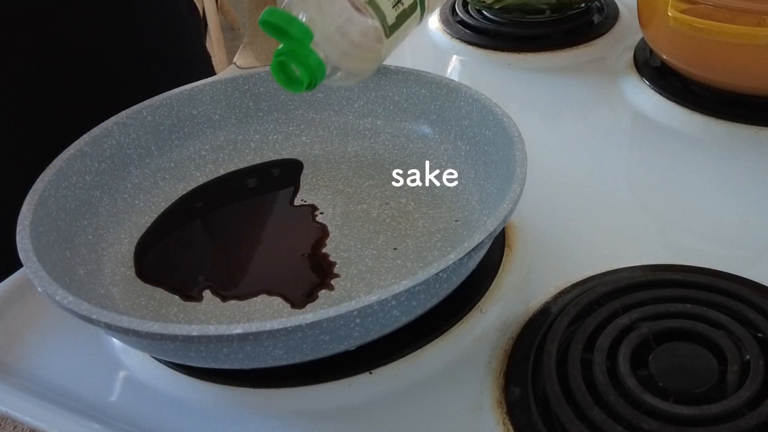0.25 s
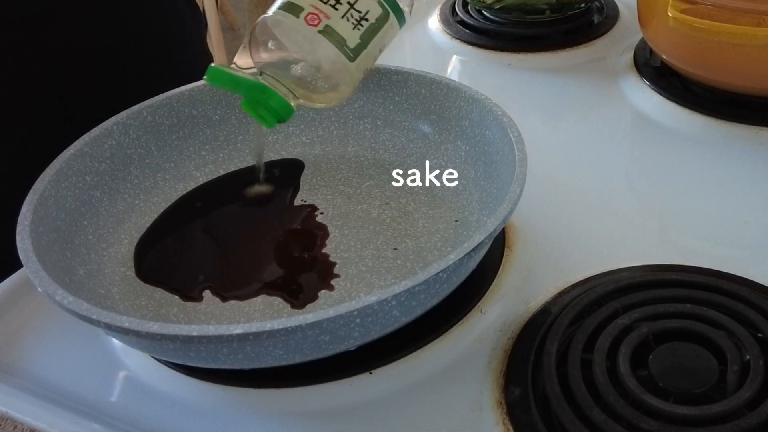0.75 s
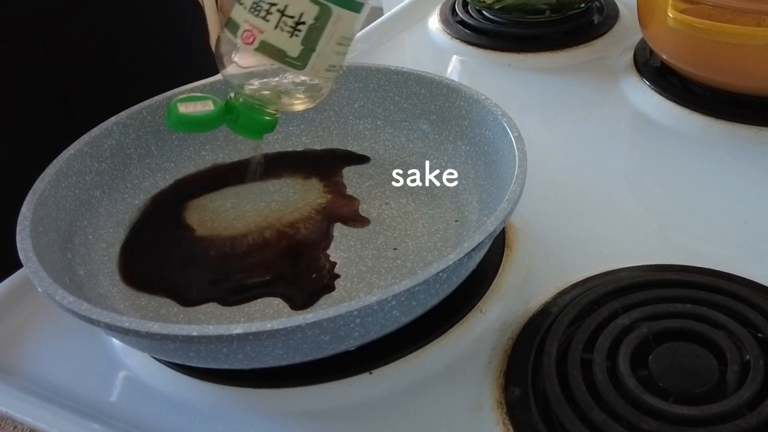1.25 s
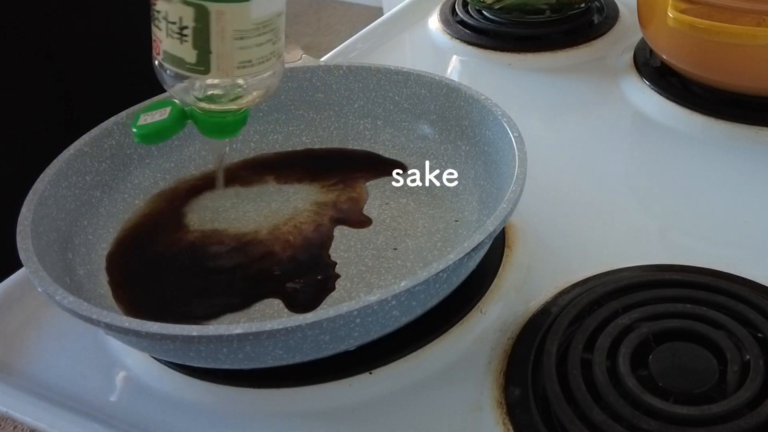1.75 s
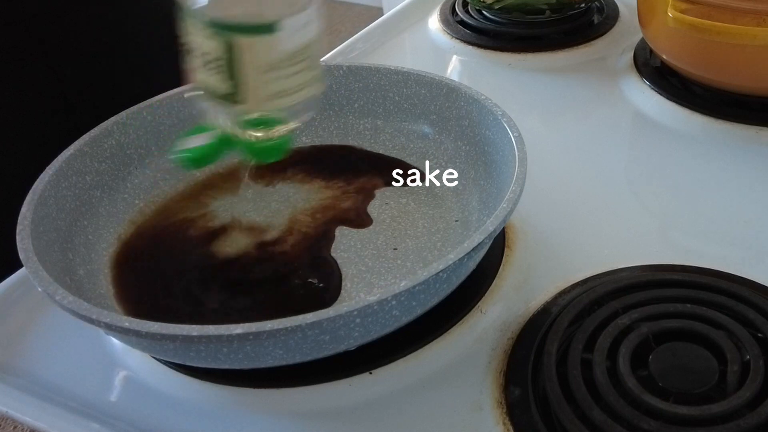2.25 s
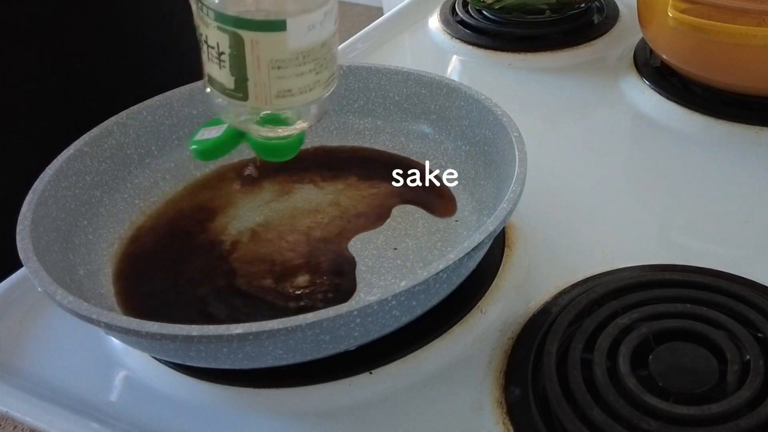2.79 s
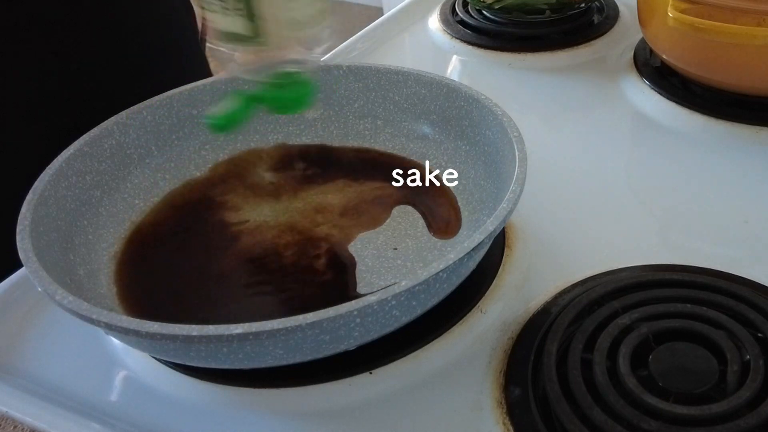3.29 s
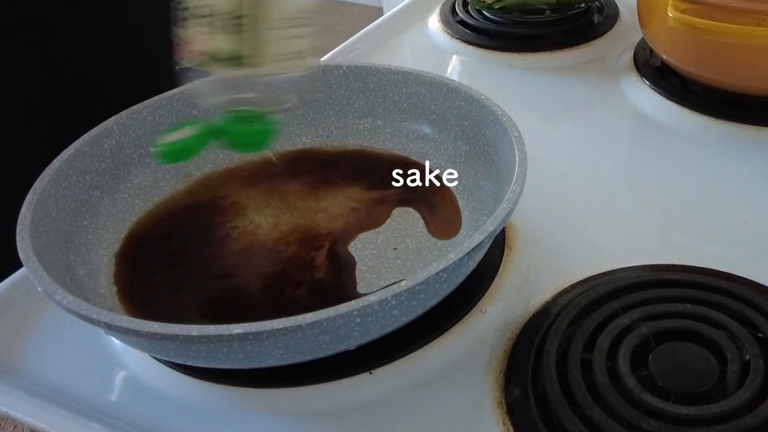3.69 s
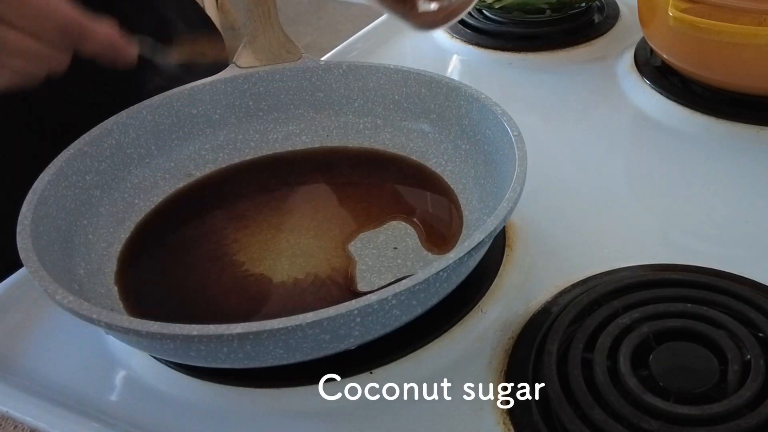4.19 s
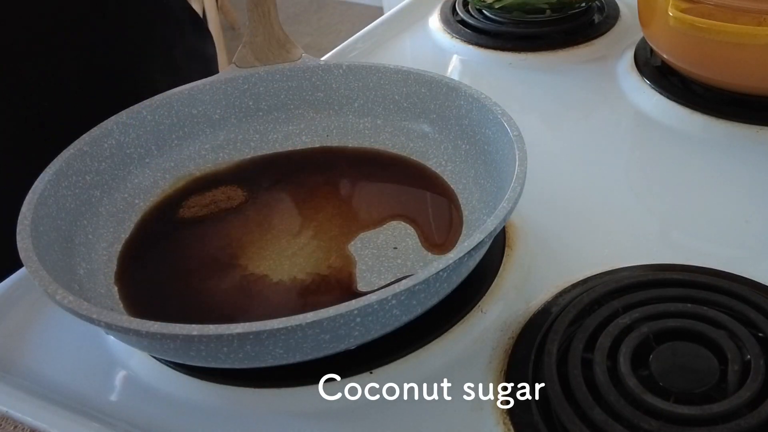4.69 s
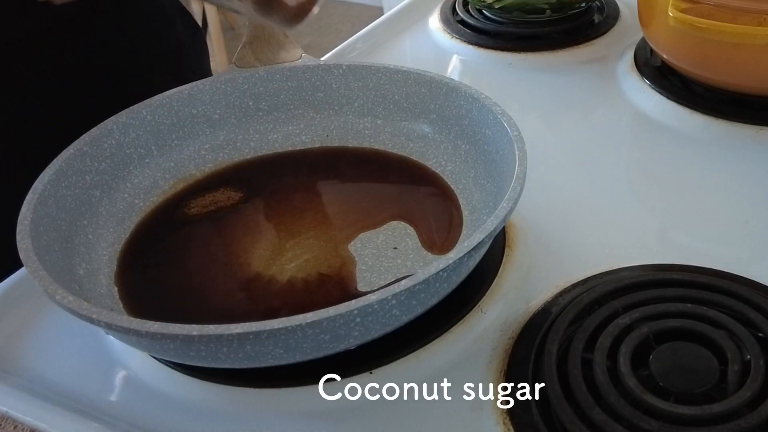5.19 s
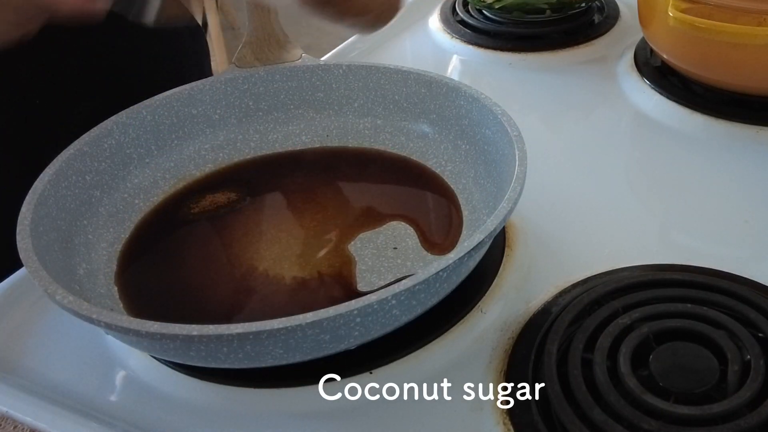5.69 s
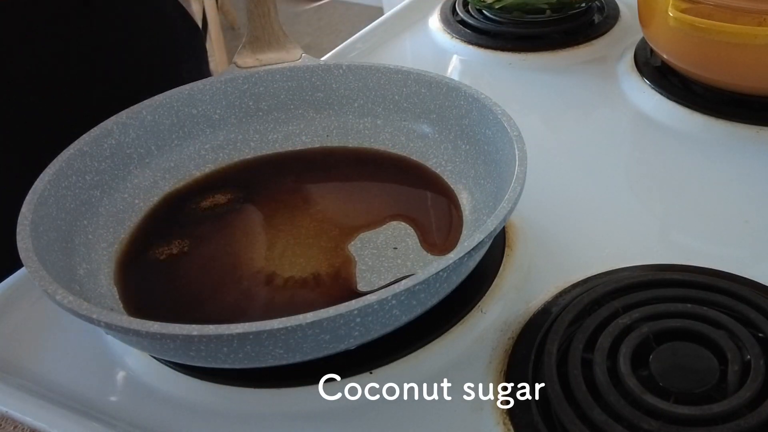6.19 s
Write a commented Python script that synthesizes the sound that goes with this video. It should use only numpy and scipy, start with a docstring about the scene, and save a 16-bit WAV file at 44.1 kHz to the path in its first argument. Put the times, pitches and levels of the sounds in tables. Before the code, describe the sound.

In a humming kitchen, a pan knock fades, liquid dribbles and drips into sauce, then sugar is spooned from a jar with clinks and ticks.

```python
"""First a knock on a pan dies away over a low motor hum, in a quiet kitchen. Rice wine trickles from a plastic
bottle into a pan of sauce: bursts of noise for splashes, gliding tones for drips, under a fine hiss and a thin
pulsing whine. A gulp of air follows. Then, among small clicks and ticks, a spoon clinks in a glass jar as a set
of ringing tones, grinds and scoops sugar as grainy noise, and tips it into the pan with a soft swish."""
import sys
import numpy as np
from scipy import signal
from scipy.fft import rfft, irfft, next_fast_len
from scipy.io import wavfile

SR = 44100
rng = np.random.default_rng(int(sys.argv[2]) if len(sys.argv) > 2 else 0)


def transcribe(signal):
    """Save signal, clipped to [-1, 1], as a 16-bit WAV file at the path in sys.argv[1]."""
    frames = np.atleast_2d(signal).T
    limited = np.clip(frames, -1, 1)
    pcm = np.round(limited * 32767).astype(np.int16)
    wavfile.write(sys.argv[1], SR, pcm)


N = 284445   # length in samples
TIME = np.arange(N) / SR   # seconds
BINS = np.maximum(np.arange(N // 2 + 1) * SR / N, 1)   # Hz
ROOM_T60_S = 0.46   # time for the room's reflections to fall by 60 dB
# share of a contact's power that is the same at both ears at its start, and how fast that share fades
DIRECT_SHARE, DIRECT_S = 0.3, 0.02

# In the tables, a colour says how strong a noise is at each pitch.
# Peaks are narrow resonances in that noise; a negative lift makes a dip instead.


def from_db(db):
    """Decibels to gain."""
    return 10 ** (np.asarray(db) / 20)


def rms_one(x):
    """Scale to unit power."""
    return x / np.sqrt(np.mean(x ** 2))


def over_hz(points):
    """A short spectrum spread over all frequencies."""
    hz, value = np.transpose(points)
    return np.interp(np.log(BINS), np.log(hz), value)


def drift(rate):
    """A random wander of about unit spread, with this many new random values a second."""
    knots = rng.standard_normal(int(N / SR * rate) + 3)
    return np.interp(TIME * rate, np.arange(len(knots)), knots)


def swell(s, length, db, rise_s, fall_s):
    """A gain that rises, holds from s for the given length, and falls."""
    before = np.maximum(s - TIME, 0)
    after = np.maximum(TIME - s - length, 0)
    return from_db(db) * np.exp(-before / rise_s - after / fall_s)


# How alike the noise is at the two ears. Each row: frequency in Hz, left-right correlation.
EAR_LIKENESS = [(50, 0.7), (130, 0.7944), (260, 0.78), (480, 0.14), (1100, 0.21), (2400, 0.55),
                (5000, -0.1415), (12000, 0.0335)]


def noise(colour, peaks=()):
    """Stereo noise of the given dB per Hz, lifted at resonances; the ears agree more at some pitches."""
    gain = from_db(over_hz(colour)) * np.sqrt(SR / 2)
    for hz, width, lift_db in peaks:
        resonance = 1 / (1 + (2 * (BINS - hz) / width) ** 2)
        gain = gain * np.sqrt(1 + (from_db(lift_db) ** 2 - 1) * resonance)
    alike = over_hz(EAR_LIKENESS)
    size = next_fast_len(N, True)
    mid, side = rfft(rng.standard_normal((2, size)))
    grid = np.arange(size // 2 + 1) * SR / size
    mid = mid * np.interp(grid, BINS, gain * np.sqrt((1 + alike) / 2))
    side = side * np.interp(grid, BINS, gain * np.sqrt((1 - alike) / 2))
    return irfft([mid + side, mid - side], size)[:, :N]


def bursts(rows, colour, attack, hold, t60, tail_db, peaks=()):
    """Short rough contacts: noise that rises, holds, dies, and lingers in the room, wider with age."""
    near, spread = np.zeros((2, N))
    for s, db in rows:
        start = int(s * SR)
        age = TIME[:min(N - start, SR // 2)]
        direct = from_db(-60 * np.maximum(age - hold, 0) / t60)
        tail = from_db(tail_db - 60 * age / ROOM_T60_S)
        rise = from_db(db) * (1 - np.exp(-age / attack))
        power = rise ** 2 * (direct ** 2 + tail ** 2)
        share = DIRECT_SHARE * np.exp(-age / DIRECT_S)
        near[start:start + len(age)] += power * share
        spread[start:start + len(age)] += power * (1 - share)
    same_at_both_ears = np.sqrt(near) * rms_one(noise(colour, peaks)[0])
    return same_at_both_ears + np.sqrt(spread) * rms_one(noise(colour, peaks))


def struck(rows, modes, scatter_db, flutter_db):
    """Each blow rings every mode at a strength of its own, fluttering as it dies; tilt thins the low modes."""
    out = np.zeros(N)
    top_hz = max(hz for hz, _, _ in modes)
    for s, db, tilt in rows:
        start = int(s * SR)
        age = TIME[:min(N - start, SR // 2)]
        for hz, mode_db, t60 in modes:
            chance_db = scatter_db * rng.standard_normal() + flutter_db * np.tanh(drift(70)[:len(age)])
            level_db = db + mode_db + tilt * np.log2(hz / top_hz) + chance_db
            ring = from_db(level_db - 60 * age / t60) * np.sin(2 * np.pi * hz * age)
            out[start:start + len(age)] += ring
    return out


def kitchen(x, wet_db):
    """Direct sound plus dense reflections, different at each ear."""
    age = TIME[:SR // 2]
    echoes = rng.standard_normal((2, len(age))) * from_db(-60 * age / ROOM_T60_S) * (age > .003)
    echoes /= np.sqrt(np.sum(echoes ** 2, axis=1, keepdims=True))
    return x + from_db(wet_db) * signal.fftconvolve(x[None], echoes, axes=1)[:, :N]


EASE_S = 2.875   # when the pouring eases
# Fainter spits fall at random between the spurts.
SPITS_PER_S, SPIT_DB, SPIT_SCATTER_DB = 5, -54, 2   # relative level, like the spurts
# The trickle lands in spurts. Each row: start in seconds, relative level in dB.
SPURTS = [(0.2664, -51), (0.4233, -46), (0.5705, -48), (0.6159, -50), (0.799, -47.5), (0.9456, -45),
          (1.0948, -48), (1.2235, -49.5), (1.3891, -49)]
# Each row: frequency in Hz, relative level in dB per Hz.
SPLASH_COLOUR = [(1000, 5.5), (2400, 2), (5500, 5), (8000, -6), (14000, -18)]


def splashes():
    """The trickle breaks the surface in spurts and random faint spits, each a short burst of noise."""
    times = np.cumsum(rng.exponential(size=40)) / SPITS_PER_S
    levels = SPIT_DB + SPIT_SCATTER_DB * rng.standard_normal(size=40)
    spits = [(s, db) for s, db in zip(times, levels) if s < EASE_S]
    landings = list(SPURTS) + spits
    return from_db(-7.5) * bursts(landings, SPLASH_COLOUR, attack=0.001635, hold=0.0063, t60=0.041,
                                  tail_db=-3)


WALL_S, WALL_DB = 0.0096, -11   # delay and level of the first echo, off the wall behind the stove
# Each row: start in seconds, level in dB, starting pitch in Hz, final pitch in Hz,
# glide time in seconds, time to fall by 60 dB in seconds.
DRIPS = [(1.959, -51.5, 3120, 3250, .01, 0.07), (2.269, -54.5, 1520, 1600, 0.00959, .08),
         (2.562, -52, 3333, 3380, 0.0072, 0.042), (2.641, -53, 1863, 2070, .004, .025),
         (2.642, -41, 2350, 2650, 0.0022, 0.024), (3.325, -49.5, 5850, 6400, .005, 0.016),
         (3.372, -58, 7343, 8600, .004, .02), (3.389, -52, 5220, 6200, 0.0032, 0.02),
         (3.403, -41.5, 3851, 11900, 0.0075, 0.017), (3.423, -51.5, 4400, 3440, 0.001872, 0.0304),
         (3.428, -51.5, 4000, 4503, 0.0043, 0.041), (3.534, -51.5, 1340, 1570, 0.010804, 0.084),
         (3.604, -55, 6747, 9000, .003, .015)]


def drips():
    """A trapped bubble rings briefly and glides, mostly up, near the surface; the wall echoes it once."""
    out, age = np.zeros(N), TIME[:SR // 10]
    for s, db, start_hz, end_hz, glide, t60 in DRIPS:
        start = int(s * SR)
        pitch = end_hz + (start_hz - end_hz) * np.exp(-age / glide)
        pitch = pitch * (1 + 0.043 * drift(899)[:len(age)])   # a rough, unsteady pitch
        level = from_db(db - 60 * age / t60) * (1 - np.exp(-age / 0.00039))
        out[start:start + len(age)] += level * np.sin(2 * np.pi * np.cumsum(pitch) / SR)
    out = out + from_db(WALL_DB) * np.interp(TIME - WALL_S, TIME, out)
    return kitchen(out, wet_db=-6)


SPRAY_ABOVE_HZ = 3600   # drips that start higher than this throw up spray
# Each row: frequency in Hz, relative level in dB per Hz.
DRIP_SPRAY_COLOUR = [(900, -20.5), (2500, -10), (4300, -1), (6500, 7), (9000, -1), (15000, -11.5)]


def drip_spray():
    """Each of the small, high drips throws up a little spray of noise as it lands."""
    small = [(s, db) for s, db, hz, *_ in DRIPS if hz > SPRAY_ABOVE_HZ]
    return from_db(-12.0) * bursts(small, DRIP_SPRAY_COLOUR, attack=.0005, hold=0.003863, t60=0.072,
                                   tail_db=-20.5)


# A knock on the pan. Each row: start in seconds, relative level in dB, tilt in dB per octave.
PAN_KNOCKS = [(.001, -48.5, 0)]
# Each row: frequency in Hz, level in dB against the knock, time to fall by 60 dB in seconds.
PAN_MODES = [(592.6, 3.5, 0.5), (832, -4, 0.28), (1373, 0.5, 0.37), (1623.7, -4, 0.32)]
# Each row: frequency in Hz, relative level in dB per Hz.
PAN_COLOUR = [(170, 4), (450, -5), (680, -13), (1000, -19), (1500, -22), (4000, -24), (9000, -31),
              (16000, -51.5)]


def pan_knock():
    """The knocked pan rings at a few pitches over a dull thud of noise."""
    ring = kitchen(struck(PAN_KNOCKS, PAN_MODES, scatter_db=.5, flutter_db=1), wet_db=-18)
    knocks = [(s, db) for s, db, _ in PAN_KNOCKS]
    thud = bursts(knocks, PAN_COLOUR, attack=0.000467, hold=0.022, t60=0.19, tail_db=1)
    return ring + from_db(8.5) * thud


# The plastic bottle snaps. Each row: start in seconds, relative level in dB.
SNAPS = [(2.0754, -42.5)]
# Each row: frequency in Hz, relative level in dB per Hz.
SNAP_COLOUR = [(850, -7), (1200, 4.5), (1500, 7), (2200, 2.5), (3200, -3), (5000, -5), (6400, 0),
               (10000, -11), (16000, -20.5)]
# Each row: frequency in Hz, width in Hz, lift in dB.
SNAP_PEAKS = [(1230, 160, 5.5), (1965, 179.5, 1)]


def bottle_snap():
    """The bottle wall snaps: one very short burst of noise with two resonances."""
    return from_db(0.5) * bursts(SNAPS, SNAP_COLOUR, attack=0.0002, hold=0.0015, t60=0.065,
                                 tail_db=-18, peaks=SNAP_PEAKS)


def pouring():
    """The pan rings out, the trickle splashes and drips, the bottle wall snaps."""
    return pan_knock() + splashes() + bottle_snap() + drips() + drip_spray()


HISS_DB, HISS_EASED_DB = -58.5, -65.5
STOP_S, HISS_RELEASE_S = 3.73, .028   # when the hiss ends, and how quickly each step falls
RUSTLE_S, RUSTLE_HOLD_S, RUSTLE_DB = 3.867, 0.19, -64   # the bottle is taken away
# For the hiss. Each row: frequency in Hz, relative level in dB per Hz.
HISS_COLOUR = [(1400, -6), (2100, -13.5), (3100, 3), (4000, -7), (6000, -3.5), (8500, -5), (12000, -6),
               (16000, -2.5)]
# Each row: frequency in Hz, width in Hz, lift in dB.
HISS_PEAKS = [(2337, 110, 12), (2944, 19, 9.5), (3220, 74, -5), (3900, 122.3, 4.5), (4470, 310, 10),
              (5100, 100, 5), (5700, 42, 9.5), (6032, 110, 5), (7808.9, 200, 7), (9320, 93, 7),
              (10480, 90, -10), (10900, 160, 5.5), (11900, 120, 5), (13900, 110, 4)]
# For the rustle. Each row: frequency in Hz, relative level in dB per Hz.
RUSTLE_COLOUR = [(900, -7), (1800, -1), (3000, -4), (6000, -7), (10000, -11.5), (16000, -17.5)]


def hiss():
    """A fine noise with fixed resonances drops to a lower step and stops; a soft rustle takes over."""
    full = swell(0, EASE_S, HISS_DB, HISS_RELEASE_S, HISS_RELEASE_S)
    eased = swell(0, STOP_S, HISS_EASED_DB, HISS_RELEASE_S, HISS_RELEASE_S)
    level = np.maximum(full, eased) * from_db(1.3 * drift(45))
    rustle = swell(RUSTLE_S, RUSTLE_HOLD_S, RUSTLE_DB, rise_s=0.28, fall_s=0.1)
    return level * rms_one(noise(HISS_COLOUR, HISS_PEAKS)) + rustle * rms_one(noise(RUSTLE_COLOUR))


PULSE_S, PULSE_SCATTER_DB = 0.0099, 1.5883   # half-length and unevenness of the pulses
WHINE_HZ, WHINE_TONE_DB = 2296, -5.5   # the clear tone, and its level against the noise
# Runs of pulses. Each row: first pulse in seconds, end in seconds, spacing in seconds, level in dB.
# A row that ends before it starts plays nothing.
WHINE_RUNS = [(0.269, 0.31, 0.0403, -60), (0.41, 0.49, 0.057, -61.5), (0.569, 0.83, 0.05388, -65),
              (0.909, 0.96, 0.044, -64), (1.103, 1.3, 0.04286, -63.5), (1.426, 1.55, 0.03, -62.5),
              (1.602, 1.67, 0.057, -59), (1.708, 1.84, 0.0605, -64), (1.882, 2.14, 0.059, -62),
              (2.238, 2.62, 0.058, -67), (2.666, 2.84, 0.044, -68.5), (2.951, 2.95, 0.046, -61),
              (2.995, 3.19, 0.061, -65.5), (3.315, 3.57, 0.058, -64), (3.595, 3.73, 0.04422, -65.5)]
# Each row: frequency in Hz, relative level in dB per Hz.
WHINE_COLOUR = [(1000, -31), (2300, -5), (6000, 7), (9000, -22), (16000, -7)]
# Each row: frequency in Hz, width in Hz, lift in dB.
WHINE_PEAKS = [(2900, 170, 10.5), (4600, 58, 12), (4919.5, 91, 6), (6320, 76, 14), (7636, 82, 16)]


def whine():
    """Runs of soft pulses, each of its own strength, sound one clear tone and a resonant noise."""
    level = np.zeros(N)
    for first, end, spacing, db in WHINE_RUNS:
        for s in np.arange(first, end, spacing):
            around = slice(int((s - 3 * PULSE_S) * SR), int((s + 3 * PULSE_S) * SR))
            strength = from_db(db + PULSE_SCATTER_DB * rng.standard_normal())
            level[around] += strength * np.exp(-((TIME[around] - s) / PULSE_S) ** 2)
    tone = np.sqrt(2) * np.sin(2 * np.pi * WHINE_HZ * TIME + 2.6 * drift(50))
    return level * (from_db(WHINE_TONE_DB) * tone + rms_one(noise(WHINE_COLOUR, WHINE_PEAKS)))


# Spoon against the jar. Each row: start in seconds, relative level in dB, tilt of the ring in dB per
# octave, dull crack in dB against that level, bright crack in dB against that level.
CLINKS = [(5.1336, -37.5, 0, 3.5, -20), (5.2936, -41, 2, -8, 0.5)]
# Each row: frequency in Hz, relative level in dB, time to fall by 60 dB in seconds.
JAR_MODES = [(1680, -5, 0.14), (1710, 7, 0.0351), (1980, -13, .17), (2241.2, -11, 0.18), (3060, -11, 0.17),
             (3160, -17, 0.18), (3210, 7, 0.055), (5157, -3, 0.19), (5330, -10, 0.27), (5356, -8, 0.19),
             (6600, -19, 0.17), (7010, -12, 0.06), (8520, -23, .08), (9589, -17, .08)]
# For the chatter. Each row: frequency in Hz, relative level in dB per Hz.
CHATTER_COLOUR = [(200, -19), (600, 4), (1600, -2), (4000, -7), (5400, -4), (5950, -12), (6500, -4.5),
                  (9000, -7), (11000, -20), (16000, -24)]
# Clusters of close modes, as resonances. Each row: frequency in Hz, width in Hz, lift in dB.
CHATTER_PEAKS = [(1695.7, 143.2, 14), (3160, 90, 24), (5370, 230, 18), (6418, 160, 5), (7150, 180, 2),
                 (8500, 250, 9), (9500, 250, 4)]
# For the two cracks. Each row: frequency in Hz, relative level in dB per Hz.
DULL_CRACK_COLOUR = [(150, -31), (500, -5), (850, 11), (1050, 1), (1400, -9), (1750, 9), (2600, 2),
                     (3200, 11.5), (4100, -6), (4800, 6), (5250, 17.5), (5900, -21), (7200, -6),
                     (8700, -11.5), (9600, -13), (10500, -27.5), (13500, -24), (15000, -45)]
BRIGHT_CRACK_COLOUR = [(300, -30), (1000, -24), (2500, 7), (3800, -1), (5300, 15), (5900, -6), (6450, 8.5),
                       (7050, 20), (7800, -4.5), (8500, 10), (10200, -7), (11200, 0), (15500, -1)]


def clinks():
    """The spoon makes the glass ring, chatters on in clusters of modes, and cracks sharply at contact."""
    ring = struck([row[:3] for row in CLINKS], JAR_MODES, scatter_db=1, flutter_db=7)
    ring = kitchen(from_db(-11) * ring, wet_db=-4)
    chatter = bursts([row[:2] for row in CLINKS], CHATTER_COLOUR, attack=0.000764, hold=0.01, t60=0.085,
                     tail_db=-10.5, peaks=CHATTER_PEAKS)
    dull_rows = [(s, db + dull_db) for s, db, _, dull_db, _ in CLINKS]
    bright_rows = [(s, db + bright_db) for s, db, _, _, bright_db in CLINKS]
    dull = bursts(dull_rows, DULL_CRACK_COLOUR, attack=.0002, hold=.002, t60=.025, tail_db=-28)
    bright = bursts(bright_rows, BRIGHT_CRACK_COLOUR, attack=.0002, hold=.0025, t60=.035, tail_db=-21)
    return ring + from_db(-5.0) * chatter + dull + bright


# Sugar grinds under the spoon. Each row: start in seconds, length in seconds, level in dB.
GRINDS = [(5.217, 0.089, -67.5), (5.307, 0.0271, -61.5), (5.465, 0.053, -74)]
# Each row: frequency in Hz, relative level in dB per Hz.
GRIND_COLOUR = [(1500, -21.5), (4000, 7), (8000, 5), (11000, -1), (16000, -4)]


def grinding():
    """Sugar grains crushed under the spoon: bright noise with a fast random flicker."""
    level = sum(swell(s, length, db, rise_s=0.0093, fall_s=0.023) for s, length, db in GRINDS)
    return level * from_db(1.8 * drift(500)) * rms_one(noise(GRIND_COLOUR))


SCOOP_S, SCOOP_HOLD_S, SCOOP_DB = 5.662, .018, -50.5
SCOOP_RISE_S, SCOOP_FALL_S = .02, .034
# Each row: frequency in Hz, relative level in dB per Hz.
SCOOP_COLOUR = [(800, -2), (1700, -3.5), (3000, -7), (6000, -12), (10000, -21), (16000, -23)]
# Each row: frequency in Hz, width in Hz, lift in dB.
SCOOP_PEAKS = [(1780, 120, 15.5), (3040, 46, 25), (4850, 110, 16.5), (7450, 240, 14), (10550, 240, 17.5),
               (14013, 700, 12)]


def scoop():
    """The spoon digs into the sugar: grainy noise whose resonances make spoon and jar sing."""
    level = swell(SCOOP_S, SCOOP_HOLD_S, SCOOP_DB, SCOOP_RISE_S, SCOOP_FALL_S)
    return level * from_db(2.0 * drift(250)) * rms_one(noise(SCOOP_COLOUR, SCOOP_PEAKS))


# Air into the bottle, and later sugar off the spoon.
# Each row: start in seconds, length in seconds, level in dB, edge in seconds.
SWISHES = [(3.203, 0.096, -57, 0.011), (4.43, 0.0099, -71, 0.00755), (4.526, 0.023, -61, 0.019),
           (6.092, 0.017, -63.5, 0.01033)]
# Each row: frequency in Hz, relative level in dB per Hz.
SWISH_COLOUR = [(2000, -6.5), (4500, -4), (8500, -2), (12000, -5), (16000, -6)]


def swishes():
    """Brief grainy rushes of noise with soft edges."""
    level = sum(swell(s, length, db, edge, edge) for s, length, db, edge in SWISHES)
    return level * from_db(3.1 * drift(330)) * rms_one(noise(SWISH_COLOUR))


# A firm click and then a thinner one. Each row: start in seconds, relative level in dB,
# seconds until the second click, its relative level in dB.
DOUBLE_CLICKS = [(4.208, -50.5, 0.034, -52), (4.9004, -52.5, 0.038, -53.5), (5.415, -53.5, 0.1234, -53),
                 (6.0408, -53, 0.13, -51)]
# Thin clicks on their own. Each row: start in seconds, relative level in dB.
LONE_CLICKS = [(4.742, -66), (6.281, -61.5)]
# For firm, then thin clicks. Each row: frequency in Hz, relative level in dB per Hz.
FIRM_COLOUR = [(1200, -2.5), (2700, -5), (4000, -0.5), (5800, 3), (6800, -2.5), (8000, -8.5), (9800, -12),
               (11500, -23), (16000, -22)]
THIN_COLOUR = [(1200, -10.5), (2600, -0.5), (4500, 1), (7000, -2), (8500, -6), (11000, -11), (16000, -18)]
# For firm, then thin clicks. Each row: frequency in Hz, width in Hz, lift in dB.
FIRM_PEAKS = [(2550, 90, 13.5), (5269, 110, -9), (5700, 160, -1), (6000, 160, 3)]
THIN_PEAKS = [(2600, 120, 12), (6601.3, 280, 6.5)]


def clicks():
    """Short bursts of noise: a firm dry click, then a thinner one; two faint thin ones come alone."""
    firm_rows = [(s, db) for s, db, _, _ in DOUBLE_CLICKS]
    thin_rows = [(s + gap, db) for s, _, gap, db in DOUBLE_CLICKS] + list(LONE_CLICKS)
    firm = bursts(firm_rows, FIRM_COLOUR, attack=.0004, hold=0.011, t60=0.11, tail_db=-14,
                  peaks=FIRM_PEAKS)
    thin = bursts(thin_rows, THIN_COLOUR, attack=0.00031, hold=0.0042, t60=0.15, tail_db=-8.5,
                  peaks=THIN_PEAKS)
    return from_db(-4.5) * firm + from_db(-6.5) * thin


# A dull ticking, about four a second. Each row: start in seconds, relative level in dB.
TICKS = [(3.936, -57.5), (4.148, -55), (4.395, -57), (4.718, -59), (4.964, -56), (5.215, -59),
         (5.405, -55.5), (5.885, -60.5), (6.136, -55.5), (6.388, -60)]
# Each row: frequency in Hz, level in dB against the tick, time to fall by 60 dB in seconds.
TICK_MODES = [(1646, -5, 0.12), (3390, -9.5, 0.14)]
# Each row: frequency in Hz, relative level in dB per Hz.
TICK_COLOUR = [(900, 1), (1700, 6), (2500, -3), (3300, -4), (4400, -11.5), (9000, -22.5)]
# Each row: frequency in Hz, width in Hz, lift in dB.
TICK_PEAKS = [(1654, 190, 6.5), (2060, 70, 5), (2580, 87, 7.5)]


def ticking():
    """A small dull burst of noise, each time with a short ping at the same two pitches."""
    blows = [(s, db, 0) for s, db in TICKS]
    ping = kitchen(struck(blows, TICK_MODES, scatter_db=1, flutter_db=2), wet_db=-6)
    knock = bursts(TICKS, TICK_COLOUR, attack=.0003, hold=0.014, t60=0.11, tail_db=-15, peaks=TICK_PEAKS)
    return ping + from_db(-2) * knock


MOTOR_HZ, FAN_HZ, FAN_DB = 47.7, 102.25, -42.5
SKIP_S = 3.755   # the hum's harmonics dip for an instant here
# Each row: multiple of the motor's pitch, level in dB, waver in dB.
MOTOR_HARMONICS = [(1, -31, 0.65), (2, -55.5, 8), (4, -56.5, 0), (8, -69, 3), (9, -69.5, 4), (11, -76.5, 0),
                   (12, -81, 7.5), (13, -77.5, 4.5), (15, -78, 7)]
# The fifth harmonic swells and fades. Each row: time in seconds, relative level in dB.
FIFTH_HARMONIC = [(0.0, -59), (0.14, -53), (0.39, -48), (0.59, -61), (0.84, -51.5), (1.09, -59),
                  (1.67, -47.5), (1.71, -58), (1.78, -52.5), (3.88, -54.5), (4.2, -45), (4.33, -55),
                  (4.42, -50), (5.41, -49.5), (5.5, -44), (5.66, -61), (5.95, -50.5), (6.45, -51.5)]
# Weaker tones of the machines. Each row: frequency in Hz, level in dB.
DRONES = [(120, -61), (167.6, -60.5), (215.4, -61), (265.6, -60), (286, -73), (404, -73.5), (453, -75)]


def hum():
    """A motor with its harmonics, a fan tone beating against the second, and weaker wavering drones."""
    turns = MOTOR_HZ * TIME + 0.0089 * drift(2.11)
    out = np.zeros(N)
    for multiple, db, waver_db in MOTOR_HARMONICS:
        level = from_db(db + waver_db * np.tanh(drift(6)))
        out += level * np.sin(2 * np.pi * (multiple * turns + rng.random()))
    # these harmonics dip briefly and come back upside down, out of step
    out *= np.tanh((TIME - SKIP_S) / 0.003)
    fifth_db = np.interp(TIME, *np.transpose(FIFTH_HARMONIC)) - 0.5
    out += from_db(fifth_db) * np.sin(2 * np.pi * 5 * turns + .15 * drift(6.3))
    out += from_db(FAN_DB) * np.sin(2 * np.pi * FAN_HZ * TIME + 0.094 * drift(3.4))
    for hz, db in DRONES:
        level = from_db(db + 2 * np.tanh(drift(4.9)))
        out += level * np.sin(2 * np.pi * hz * TIME + .5 * drift(2.8))
    return np.sqrt(2) * out   # a sine of unit power peaks at the square root of two


# Each row: frequency in Hz, level in dB per Hz.
AIR_COLOUR = [(15, -78.5), (60, -64.5), (90, -73.5), (140, -78.5), (235, -72), (345, -88), (420, -85.5),
              (550, -93.5), (680, -95), (770, -93), (1100, -102), (1420, -92), (2100, -106), (4000, -116),
              (16000, -127)]
# Each row: frequency in Hz, width in Hz, lift in dB.
AIR_PEAKS = [(311, 18, 3.5), (402, 30, 3.5), (461, 24, 4), (502.98, 12, 5.5), (597, 23, 5), (725, 6.8, 4),
             (760, 11, 8.5), (860, 19, 3), (951.1, 9.8, 11), (1116, 8.7, 10), (3200, 530, 4)]


def room_air():
    """The steady noise of the room, with narrow resonances that waver as narrow noise does."""
    return noise(AIR_COLOUR, AIR_PEAKS)


def scene():
    """All sources over the hum and air of the room."""
    bottle = pouring() + hiss() + whine()
    spoon = clinks() + grinding() + scoop()
    return bottle + spoon + swishes() + clicks() + ticking() + hum() + room_air()


CUTOFF_HZ = 15720
# Colour of the two microphones. Each row: frequency in Hz, left minus right in dB.
MICROPHONE_LEAN = [(50, 1.65), (130, -0.96), (500, 0.93), (2000, 0.085), (12000, -1.2)]


def record(dry):
    """The two microphones differ a little in colour; a steep filter cuts the top."""
    size = next_fast_len(N + SR // 4, True)
    lean_db = np.interp(np.arange(size // 2 + 1) * SR / size, BINS, over_hz(MICROPHONE_LEAN))
    ear_gain = from_db(lean_db * np.array([[1], [-1]]) / 2)
    heard = irfft(rfft(dry, size) * ear_gain, size)[:, :N]
    return signal.sosfilt(signal.ellip(12, .1, 80, CUTOFF_HZ, fs=SR, output="sos"), heard)


dry = scene()
out = record(dry)
transcribe(out)
```